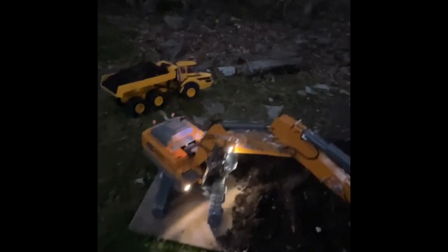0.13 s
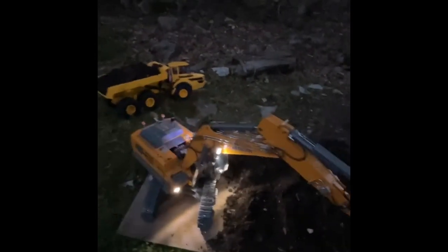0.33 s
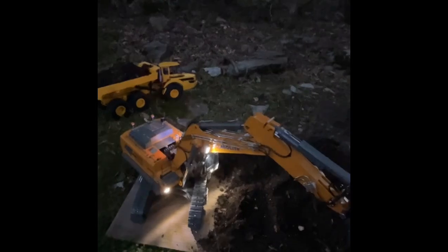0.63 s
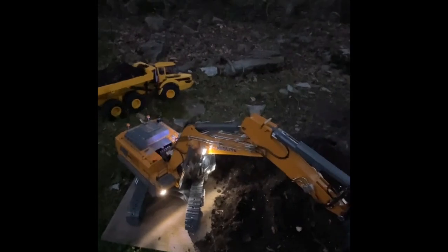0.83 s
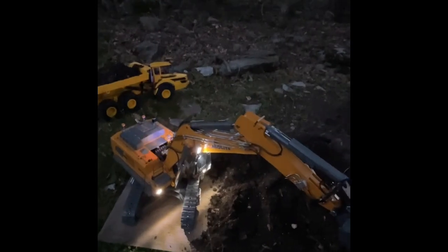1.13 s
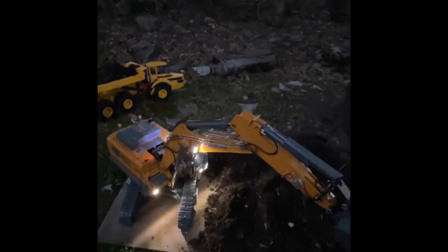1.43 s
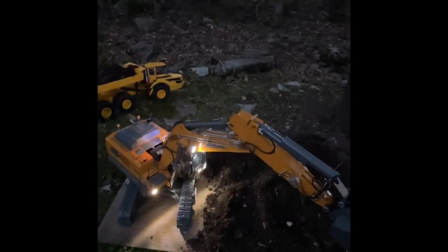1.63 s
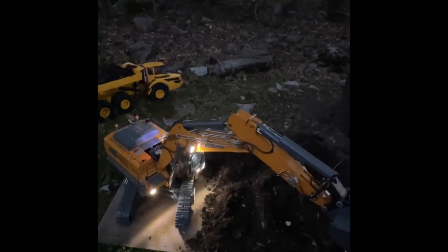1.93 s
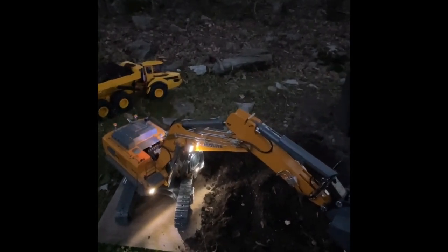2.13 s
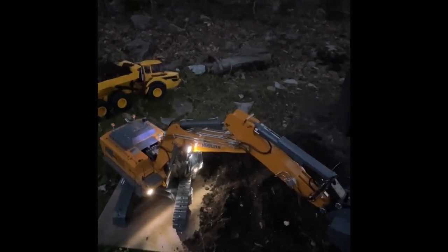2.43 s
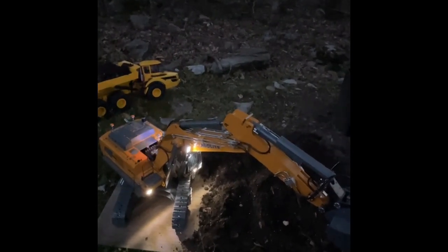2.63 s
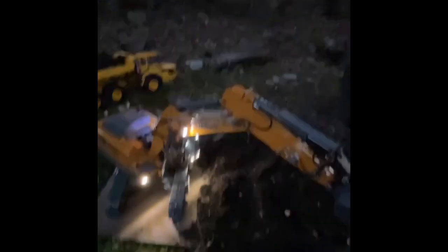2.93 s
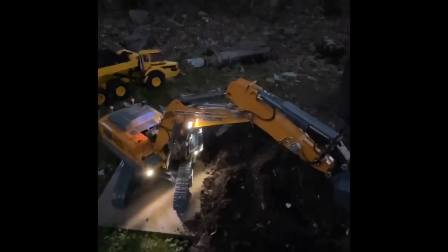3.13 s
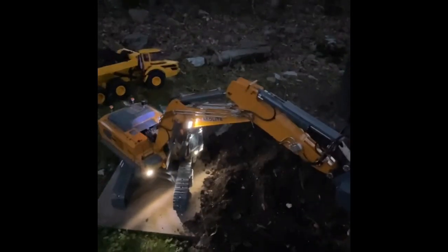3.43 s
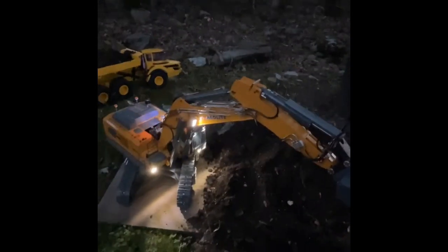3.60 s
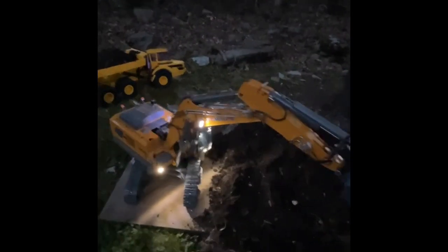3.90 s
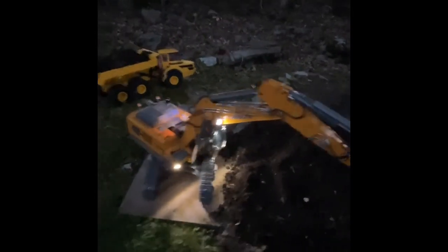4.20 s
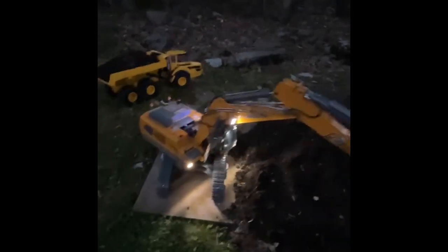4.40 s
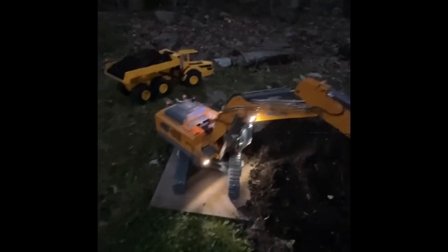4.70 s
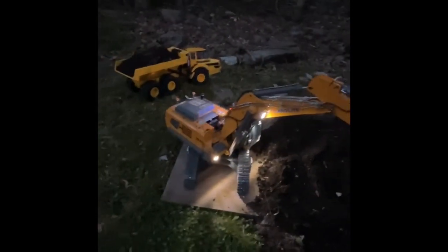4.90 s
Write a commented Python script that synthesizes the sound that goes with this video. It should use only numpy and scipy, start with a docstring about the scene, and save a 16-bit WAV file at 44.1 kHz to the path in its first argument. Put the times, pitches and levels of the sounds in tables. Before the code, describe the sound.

Sharp, irregular knocks and rattles come from the metal bucket of a model excavator digging close by outdoors, mixed with low board thumps and short gritty scrapes. They pause, return in a louder cluster just past halfway, then grow sparser. Underneath, a thin electric motor whine and the quiet, hollow rumble of tumbling soil continue throughout.

```python
"""A small electric model digger works in soil outdoors, close to a handheld two-port microphone.
From the start its pump motor whines and loose soil rumbles as it slides. In the first second the
bucket knocks and rattles, the boards under the tracks thump, and the bucket edge scrapes on grit.
A thin, far whistle leads into a lull. Near 2.7 s comes the loudest run of knocks and thumps, with
one more scrape and whistle. The knocks then thin out, while motor and soil carry on to the end."""
import sys
import numpy as np
from scipy import signal
from scipy.fft import rfft, irfft
from scipy.io import wavfile

SR = 44100
rng = np.random.default_rng(int(sys.argv[2]) if len(sys.argv) > 2 else 0)


def dump_mix(stems):
    """Bounce the given channels to the path in sys.argv[1] as a 16-bit WAV at rate SR."""
    frames = np.atleast_2d(stems).T  # one column per channel
    limited = np.clip(frames, -1, 1)  # hard clip at full scale
    pcm = np.round(limited * 32767).astype(np.int16)
    wavfile.write(sys.argv[1], SR, pcm)


N = 222925


def amp(db):
    """Turn decibels (dB) into a number to multiply by."""
    return 10 ** (np.asarray(db) / 20)

def rms_one(x):
    """Scale a sound so its average strength (rms) is 1."""
    return x / np.sqrt(np.mean(x ** 2) + 1e-20)

def peak_one(x):
    """Scale a sound so its highest peak is 1."""
    return x / np.abs(x).max()

def in_time(rows):
    """Join a table's points in time: one smooth curve for each level column."""
    times, *columns = np.transpose(rows)
    return [np.interp(np.arange(N) / SR, times, column) for column in columns]

def at_hz(points, size):
    """Read a table of (Hz, dB) at every frequency of a sound with this many samples."""
    hz = np.maximum(np.fft.rfftfreq(size, 1 / SR), 1)
    table_hz, db = np.transpose(points)
    return np.interp(np.log(hz), np.log(np.maximum(table_hz, 1)), db)

def colour(x, spectrum):
    """Make some pitches of a noise stronger than others, then scale it to strength 1."""
    return rms_one(irfft(rfft(x) * amp(at_hz(spectrum, len(x))), len(x)))

def drift(rate_hz):
    """A random wobble of about 1 either way; a higher rate wobbles faster."""
    step, warm_up = 40, 2000
    r = np.exp(-2 * np.pi * step * rate_hz / SR)
    noise = rng.standard_normal(N // step + warm_up + 2)
    slow = signal.lfilter([1], [1, -2 * r, r * r], noise)[warm_up:]
    return np.interp(np.arange(N) / step, np.arange(len(slow)), rms_one(slow))

def ring(clicks, hz, fade_s):
    """Each click starts a ringing tone. A fade time is how long it takes to drop 60 dB."""
    r, w = amp(-60 / (fade_s * SR)), 2 * np.pi * hz / SR
    return signal.lfilter([0, np.sin(w)], [1, -2 * r * np.cos(w), r * r], clicks + 1e-18)

def add(out, x, start_s):
    """Mix x into out at the given time."""
    i = round(start_s * SR)
    out[i:i + len(x)] += x[:N - i]

def gate(start, end, edge_s=0.01):
    """A volume curve that turns softly on, then off."""
    t = np.arange(N) / SR
    return np.clip(np.minimum(t - start, end - t) / edge_s + .5, 0, 1)

def aftermath(events, share, fade_s):
    """A volume curve that jumps at each event by a share of its dB, then dies away."""
    kicks = np.zeros(N)
    for start, db, *_ in events:
        kicks[round(start * SR)] += amp(share * db)
    return signal.lfilter([1], [1, -amp(-60 / (fade_s * SR))], kicks)


SHAFT_HZ, SWITCHING_HZ = 18.98, 8000.3
# Side tones lie whole steps of SHAFT_HZ from the switching tone. The main three swell and fade as
# the hand moves. Each row: time in seconds, then levels in dB at steps +4, -24 and -10.
MAIN_TONE_LEVELS = [(0.0, -57, -57, -69), (0.35, -50.5, -60, -80), (0.65, -65, -59, -75),
                    (1.1, -62, -60.5, -65), (1.9, -70, -66, -65), (2.55, -66, -60, -66),
                    (2.8, -59, -61, -53.5), (3.2, -49, -61.5, -52.5), (3.7, -46.5, -56.5, -54.5),
                    (4.2, -50.5, -55.5, -56), (4.4, -56, -58, -53), (4.65, -52, -65, -57.5),
                    (5.05, -48, -81, -60)]
# The other side tones. Each row: steps from the switching tone, relative level in dB.
SIDE_TONES = [(-150, -85), (-108, -81), (-101, -83), (-66, -77), (-59, -84), (-52, -84), (-45, -81),
              (-38, -87), (-25, -79), (-21, -74), (-20, -76), (-19, -78), (-17, -72), (-14, -70),
              (-11, -77), (-9, -75), (-8, -77), (-6, -63), (-2, -76), (-1, -73), (0, -72), (1, -71),
              (2, -71), (3, -65), (5, -70), (6, -59), (7, -74), (8, -77), (10, -73), (12, -67), (32, -85),
              (46, -78), (123, -86), (130, -85), (141, -87), (143, -84), (144, -80), (148, -83), (157, -86),
              (172, -86), (177, -86), (183, -79), (190, -85), (193, -81)]
# Each row: time in seconds, level of the strongest of those in dB.
SIDE_TONE_LEVEL = [(0, -59), (3.0, -57), (4.4, -62), (4.7, -59), (5.05, -57.5)]
# The shaft's own tones. Each row: multiple of its speed, relative level in dB.
SHAFT_TONES = [(73, -86), (85, -86), (108, -78), (112, -64), (116, -77), (119, -83), (126, -83), (140, -84),
               (147, -82), (154, -75), (168, -84), (182, -84), (596, -80)]
# The motor's broad noise and high hiss. Each row: pitch in Hz, relative level in dB.
NOISE_COLOUR = [(30, -26), (60, -10.5), (250, -7.5), (900, -9.5), (1500, -21.5), (2000, -8.5),
                (2400, -20.5), (2800, -13.5), (4000, -25), (6400, -23.5), (7400, -36), (7550, -12.5),
                (7850, -19.5), (8150, 1.5), (8500, -21), (10000, -87)]
HISS_COLOUR = [(8500, -58), (9300, -32.5), (10300, -14), (10800, -20.5), (11500, -17), (12000, -26),
               (12500, -46), (13000, -84)]
# How loud those two are. Each row: time in seconds, level in dB.
NOISE_LEVEL = [(0, -58.5), (2.7, -58), (3.3, -57.5), (5.05, -58)]
HISS_LEVEL = [(0.0, -64.5), (1.67, -68.5), (2.9, -66), (3.2, -77), (4.2, -61), (4.4, -69.5), (5.05, -66.5)]

def motor():
    """The pump motor's switching and spinning shaft make a whine of many tones, over noise."""
    sway = 1 + 0.0002 * drift(2)  # hand motion bends all the pitches a little
    clock = 2 * np.pi * np.cumsum(sway) / SR

    def tone(hz):
        return np.sqrt(2) * np.sin(hz * clock + rng.uniform(0, 2 * np.pi))

    def chord(rows, base_hz):
        top_db = max(db for _, db in rows)
        return sum(amp(db - top_db) * tone(base_hz + step * SHAFT_HZ) for step, db in rows)

    main_tones = zip((4, -24, -10), in_time(MAIN_TONE_LEVELS))
    whine = sum(amp(db) * tone(SWITCHING_HZ + step * SHAFT_HZ) for step, db in main_tones)
    whine += amp(in_time(SIDE_TONE_LEVEL)[0]) * chord(SIDE_TONES, SWITCHING_HZ)
    shaft = amp(-63.5 + 2.15 * drift(48)) * chord(SHAFT_TONES, 0)
    noise = amp(in_time(NOISE_LEVEL)[0] + drift(6)) * colour(rng.standard_normal(N), NOISE_COLOUR)
    hiss = amp(in_time(HISS_LEVEL)[0]) * colour(rng.standard_normal(N), [(4000, -96)] + HISS_COLOUR)
    throb = 1 + .3 * np.sin(14 * SHAFT_HZ * clock)  # 14 magnet poles pass on each turn
    return whine + shaft + noise + throb * hiss


# Sliding clods of soil. Each row: time in seconds, level in dB.
RUMBLE_LEVEL = [(0, -57.5), (.5, -55.5), (1.05, -58.5), (1.3, -55), (1.63, -52), (2.05, -62.5),
                (2.68, -62.5), (2.83, -46), (2.95, -58.5), (3.25, -56.5), (3.45, -57.5), (3.66, -55),
                (4.3, -55), (4.72, -51.5), (4.87, -55.5), (5.05, -55)]
# The hollow notes they stir. Each row: pitch in Hz, rough width in Hz, relative level in dB.
HOLLOW_NOTES = [(417, 162, -1), (492, 77, 2), (605.6, 64, -2.5), (800, 2100, -19.5)]
# Ticking grit and shaking ground. Each row: pitch in Hz, relative level in dB.
GRIT_COLOUR = [(600, 5), (1500, 8), (2500, 9), (4000, -2.5), (7000, -7), (9000, 11.5), (11000, 4),
               (12200, 0.5), (13000, -71)]
GROUND_COLOUR = [(25, -19), (50, 8.5), (90, 3.5), (160, 4.5), (260, -3.5), (400, -9.5)]

def soil():
    """Tumbling clods rumble hollowly, grit ticks against the steel, and the ground shakes."""
    rumble_db, = in_time(RUMBLE_LEVEL)
    clods = rng.standard_normal(N) * amp(0.61 * drift(72))
    rumble = sum((-1) ** k * amp(db) * rms_one(ring(clods, hz, 1.95 / width))
                 for k, (hz, width, db) in enumerate(HOLLOW_NOTES))
    grains = rng.standard_normal(N) * amp(2.9 * drift(130))
    grit = colour(grains, [(100, -51)] + GRIT_COLOUR)
    shake = rng.standard_normal(N) * amp(5.4 * drift(30))
    ground = colour(shake, GROUND_COLOUR + [(3000, -68)])
    # Both follow the rumble. Each knock also loosens grit, and each thump shakes the ground.
    grit_gain = amp(rumble_db - 11)
    grit_gain += amp(-51) * aftermath(BUCKET_KNOCKS, share=0.63, fade_s=0.73)
    ground_gain = amp(-70.5 + 0.5 * (rumble_db - rumble_db.mean()))
    ground_gain += amp(-26.5) * aftermath(BOARD_THUMPS, share=0.93, fade_s=0.67)
    return amp(rumble_db) * rms_one(rumble) + grit_gain * grit + ground_gain * ground


# Hits on the bucket. Each row: time in seconds, level in dB, centre pitch in Hz, crack and snap
# levels in dB compared with the ringing, fade time of the rattle in seconds.
BUCKET_KNOCKS = [(.04, -52.5, 600, -30, -33, 0.048), (.300, -38.5, 427, -33, -32, 0.11),
                 (.313, -19.5, 1560, -12, -20, 0.1), (.325, -24.5, 1120, -13, -37, 0.031),
                 (.434, -28.5, 1790, -30, -30, 0.045), (.440, -23.5, 1790, -10, -6, .05),
                 (0.453, -35.5, 1680, -17, -28, 0.076), (.510, -30.5, 1640, -12, -9, 0.043),
                 (0.684, -51.5, 600, -32, -34, 0.021), (.811, -49.5, 705, -30, -15, .028),
                 (.922, -32, 900, -26, -31, 0.023), (1.187, -37, 890, -30, -33, 0.018),
                 (1.307, -46, 2160, 8.5, 4, 0.04), (1.625, -52, 600, -35, -30, 0.52),
                 (2.627, -47.5, 1630, -28, -25, 0.18), (2.738, -18.5, 2200, -13, 2.5, 0.04),
                 (2.7521, -15.5, 1900, -5, -16, .047), (2.757, -28, 720, -40, -40, 0.1),
                 (2.765, -25.5, 1900, -22, -36, 0.11), (2.786, -37, 900, -28, -36, 0.071),
                 (2.814, -24.5, 1900, -9, -2, 0.11), (2.83, -33, 2200, 0, -5, 0.14),
                 (2.848, -33.5, 1630, -6.5, -19, 0.43), (2.877, -26, 2250, -3.5, 6, 0.045),
                 (3.012, -18.5, 2330, -12, -1, 0.13), (3.025, -20.5, 1390, -20, -30, 0.066),
                 (3.052, -24.5, 1900, -28, -30, 0.11), (3.081, -32, 1690, -30, -30, .096),
                 (3.105, -30.5, 1790, -36, -39, 0.084), (3.136, -43.5, 1610, -28, -25, 0.073),
                 (3.233, -50.5, 800, -62, -49, 0.034), (3.454, -35.5, 1650, -29, -19, 0.15),
                 (3.470, -26.5, 3120, -8.5, -20, 0.016), (3.474, -31, 755, -18, -28, 0.062),
                 (3.579, -46.5, 670, -33, -30, 0.0098), (3.678, -28.5, 1500, 6, 3, 0.032),
                 (3.729, -47, 700, -25, -25, 0.065), (3.752, -39, 1900, -4.5, -24, 0.058),
                 (3.772, -47.5, 780, -34, -30, 0.041), (4.109, -43.5, 1160, -5, -23, 0.14),
                 (4.129, -43.5, 1510, -29, -17, 0.077), (4.157, -47, 720, -23, -18, .025),
                 (4.279, -49, 734, -21, -26, 0.053), (4.307, -42, 1460, -16, -13, 0.19),
                 (4.332, -25.5, 1740, 2, -29, 0.056), (4.348, -36, 1440, -15, -13, 0.13),
                 (4.395, -40.5, 735, -35, -30, 0.044), (4.406, -36, 1610, -28, -23, 0.06),
                 (5.013, -47.5, 1500, -12, -24, 0.065)]
# The bucket's ringing notes and low thud. Each row: pitch in Hz, relative dB, fade time in seconds.
BUCKET_NOTES = [(600, -1, 0.0098), (720, -2, 0.042), (783.6, -3.5, 0.048), (913, 4, 0.017),
                (1114, -3.5, 0.022), (1285, -3.5, 0.018), (1414, -3.5, 0.034), (1560, 1, 0.026),
                (1688, 3.5, 0.016), (1900, -2.5, 0.023), (2019, -3.5, 0.025), (2200, 3.5, 0.01),
                (2423, 2, 0.013), (2666, 3, 0.0079), (3050, -3, 0.012), (3270, -6, 0.013),
                (3640, -9, 0.015), (4370, 0, 0.0086)]
THUD_NOTES = [(260, -6.5, 0.1), (357, 3.5, 0.036), (399, 6.5, 0.048), (483, -8.5, 0.059)]
# A bright crack, a higher snap and the snap's tail. Each row: pitch in Hz, relative level in dB.
CRACK_COLOUR = [(2000, -27), (3500, -13), (6300, -12.5), (8000, -12.5), (9500, -2.5), (12500, -34.5),
                (13500, -65)]
SNAP_COLOUR = [(7500, -50), (9000, 23), (11000, 7), (13000, -24), (15500, -54)]
TAIL_COLOUR = [(7500, -17), (9000, 14), (11000, -0.5), (12300, -24), (13000, -51), (14000, -80)]

def knocks():
    """One firm hit in a dying rattle makes the bucket ring, with a thud below and a crack above."""
    out, size = np.zeros(N), 8192
    rise_s, contacts_per_s = .0025, 4000
    t = np.arange(size) / SR
    shape = (len(BUCKET_KNOCKS), size)
    rattles = rng.standard_normal(shape) * (rng.random(shape) < contacts_per_s / SR)
    noises = rng.standard_normal(shape)
    click = 1.0 * (t == 0)
    hit = 4.26 * (np.arange(size) == int(rise_s * SR))
    notes = np.array([rfft(ring(click, hz, fade_s)) for hz, _, fade_s in BUCKET_NOTES])
    low_notes = sum(amp(db) * rfft(ring(click, hz, fade_s)) for hz, db, fade_s in THUD_NOTES)
    note_hz, note_db, _ = np.transpose(BUCKET_NOTES)
    signs = (-1) ** np.arange(len(notes))
    for row, rattle, noise in zip(BUCKET_KNOCKS, rattles, noises):
        time, db, centre_hz, crack_db, snap_db, fade_s = row
        fade = np.minimum(t / rise_s, amp(-60 * (t - rise_s) / fade_s))
        force = rfft((hit + rattle + 0.43 * noise) * fade)
        spread_octaves = min(9.4 * fade_s, 0.63)  # a longer rattle reaches more notes
        weights = signs * amp(note_db - 3 * (np.log2(note_hz / centre_hz) / spread_octaves) ** 2)
        ringing = peak_one(irfft(force * (weights @ notes), size))
        thud_db = -6 - 14 * np.log2(centre_hz / 1000)  # duller knocks thud more
        thud = amp(thud_db) * peak_one(irfft(force * low_notes, size))
        crack = colour(noise + 0.89 * hit, [(500, -45)] + CRACK_COLOUR + [(20000, -89)])
        crack *= fade ** 2.6 + 0.47 * fade ** 0.46  # a quick burst plus a slower tail
        snap = colour(noise + 3 * hit, [(2000, -80)] + SNAP_COLOUR) * fade ** 4
        snap += 1.37 * colour(noise, [(2000, -82)] + TAIL_COLOUR) * fade ** 0.76
        knock = ringing + thud + amp(crack_db) * peak_one(crack) + amp(snap_db) * peak_one(snap)
        add(out, amp(db) * knock, time - rise_s)
    return out


# Thumping boards. Each row: start in seconds, peak level in dB, pitch in Hz, fade time in seconds.
BOARD_THUMPS = [(0.333, -32.5, 107.2, 0.32), (0.452, -40, 97.6, 0.23), (0.793, -48, 111, 0.22),
                (0.917, -55, 72, 0.32), (1.17, -36, 69.5, 0.21), (1.233, -38.5, 61, 0.2),
                (2.741, -20.5, 88.4, 0.14), (2.875, -31, 105.5, 0.18), (2.951, -38.5, 99, 0.074),
                (3.016, -35, 119, 0.19), (3.081, -39, 100, 0.35), (3.319, -48.5, 109, 0.22),
                (3.465, -36.5, 115, 0.25), (3.667, -48, 113.6, 0.4), (4.082, -50, 103, 0.18),
                (4.305, -40.5, 57, 0.42)]

def thumps():
    """A soft push sets the boards under the tracks swinging."""
    out, push = np.zeros(N), np.zeros(SR // 2)
    push[:300] = np.hanning(300)
    shared_notes = 0.077 * ring(push, hz=75, fade_s=0.17) - 0.11 * ring(push, hz=226, fade_s=0.025)
    for start, db, hz, fade_s in BOARD_THUMPS:
        add(out, amp(db) * peak_one(ring(push, hz, fade_s) + shared_notes), start)
    return out


# Drags of the bucket. Each row: start in seconds, end in seconds, level in dB.
BUCKET_SCRAPES = [(0.775, 0.86, -63.5), (0.903, 0.98, -54), (1.196, 1.32, -58), (3.009, 3.055, -41)]
# Their hiss. Each row: pitch in Hz, relative level in dB.
SCRAPE_COLOUR = [(1500, -6.5), (3000, -8), (4200, -8.5), (6000, -7), (8000, -8.5), (11000, -3.5),
                 (13000, -68)]

def scrapes():
    """Fine grains hiss under the bucket edge as it drags over grit."""
    grains = rng.standard_normal(N) * amp(1.7 * drift(240))
    volume = sum(amp(db) * gate(start, end) for start, end, db in BUCKET_SCRAPES)
    return volume * colour(grains, [(200, -79)] + SCRAPE_COLOUR)


# Faint whistles. Each row: start in seconds, end in seconds, pitch in Hz, level in dB.
FAR_WHISTLES = [(1.40, 1.51, 4120, -72), (1.51, 1.553, 4000, -78), (3.60, 3.70, 4120, -74)]

def whistles():
    """Thin, far whistles, each a short steady tone."""
    t = np.arange(N) / SR
    return sum(amp(db) * gate(start, end) * np.sqrt(2) * np.sin(2 * np.pi * hz * t)
               for start, end, hz, db in FAR_WHISTLES)


# The ports are the microphone's two openings. Each row: pitch in Hz, left's lead in radians.
LEFT_LEAD = [(0, 0), (690, 0.2), (1290, -0.2), (2760, 0.6), (3960, 0.3), (4570, 1.7), (4910, 3.3),
             (5430, 6.3), (6550, 6.3), (6800, 7.2), (8180, 8.6), (8440, 9.4), (10100, 9.5), (11800, 12.4),
             (14100, 12.7), (15200, 15.9)]
# Each row: pitch in Hz, how much louder the left port is in dB.
LEFT_BOOST = [(60, 0.0), (110, 0.0), (200, 0.0), (380, 0.0), (700, 1.5), (1290, 2.0), (2380, 0.5),
              (4400, 0.0), (8120, 0.0), (15000, 0.0)]
# Scattered sound, for steady sources and for blows. Each row: pitch in Hz, relative level in dB.
STEADY_SCATTER = [(60, -86), (250, -33), (650, -15), (1100, -10.5), (2000, -26.5), (3000, -7.5),
                  (6000, -16), (12000, -20)]
BLOW_SCATTER = [(60, -85), (250, -47), (400, -17), (750, -8.5), (1250, -3), (2000, -24), (4000, -7),
                (12000, -31)]

def ports(x, scatter):
    """The two ports hear a sound slightly out of step, plus echoes off the ground and machine."""
    hz = np.fft.rfftfreq(N, 1 / SR)
    lead = np.interp(hz, *np.transpose(LEFT_LEAD))
    direct = np.exp(.5j * lead) * amp(at_hz(LEFT_BOOST, N) / 2)  # each side takes half the gap
    delays_s = rng.uniform(0.00104, 0.01, 16)
    echoes = np.exp(-2j * np.pi * np.outer(hz, delays_s)).sum(axis=1) / np.sqrt(len(delays_s))
    scattered = amp(at_hz(scatter, N)) * echoes
    left, right = direct + scattered, 1 / direct - scattered
    return irfft(rfft(x) * np.array([left, right]), N)

def scene():
    """Steady sounds and blows reach the ports by different paths."""
    steady = ports(motor() + soil() + scrapes() + whistles(), STEADY_SCATTER)
    blows = ports(knocks() + thumps(), BLOW_SCATTER)
    return steady + blows

def record(dry):
    """Turn down the deep bass and cut off the highest treble."""
    bass_hz, treble_hz = 48, 16000
    dry = signal.sosfilt(signal.butter(3, bass_hz, "high", fs=SR, output="sos"), dry)
    return signal.sosfilt(signal.cheby2(12, 70, treble_hz, fs=SR, output="sos"), dry)


dry = scene()
out = record(dry)
dump_mix(out)
```